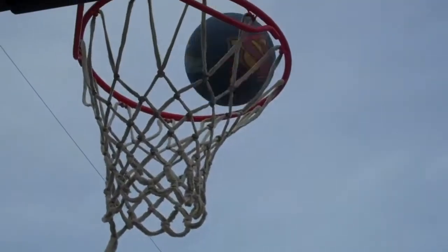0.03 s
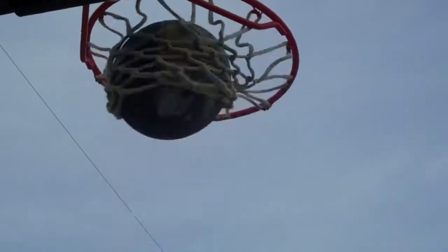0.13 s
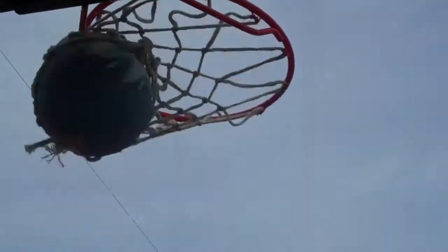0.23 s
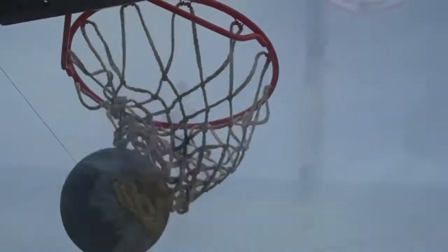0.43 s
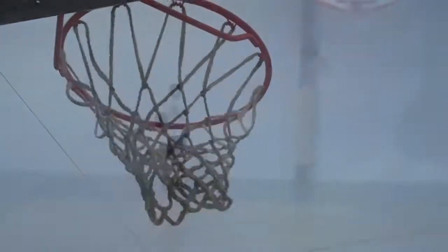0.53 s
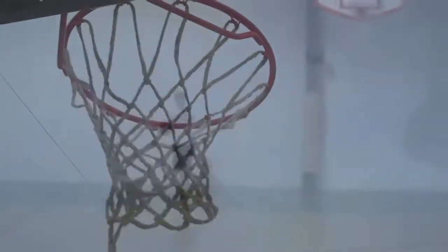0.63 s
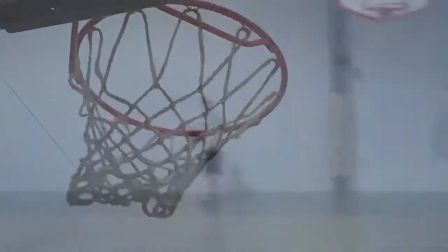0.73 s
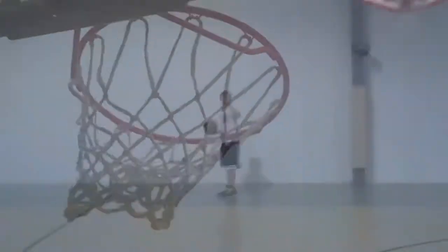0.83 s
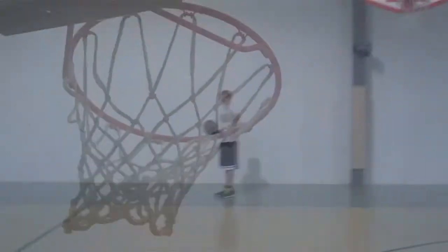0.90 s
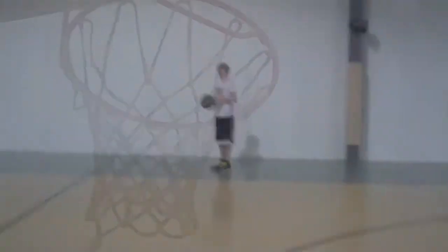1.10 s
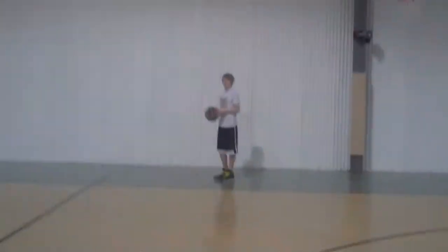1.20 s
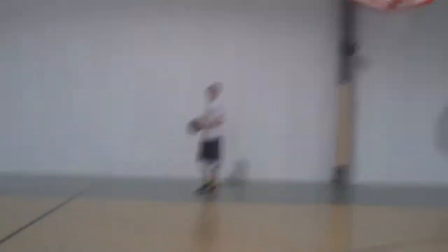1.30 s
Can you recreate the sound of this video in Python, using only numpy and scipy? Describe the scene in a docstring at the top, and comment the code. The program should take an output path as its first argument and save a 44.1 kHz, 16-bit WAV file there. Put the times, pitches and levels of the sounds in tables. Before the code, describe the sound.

Close up, a basketball hits the net with a quick snap and slides through in a rustling swish. The swinging cords settle as quiet outdoor air fades into faint gym hiss, and one dry knock comes last.

```python
"""Basketball through the net

Outdoors, close to the microphone, a ball slaps the cords in a quick volley, snaps the net taut and
slides out; the net whips back, rustles and flicks to rest. Soft bumps and a bird's chirp come first.
The outdoor air fades into the hiss of a gym, and a dry knock comes last."""
import sys
import numpy as np
from scipy import signal
from scipy.io import wavfile
from scipy.ndimage import map_coordinates

SR = 44100
rng = np.random.default_rng(int(sys.argv[2]) if len(sys.argv) > 2 else 0)


def wrap_up_sound(samples):
    """Save the sound to the file named by the first command line argument, as 16-bit audio."""
    columns = np.atleast_2d(samples).T
    # keep every value between -1 and 1, then stretch to whole-number steps
    tamed = np.clip(columns, -1, 1)
    steps = np.round(tamed * 32767).astype(np.int16)
    wavfile.write(sys.argv[1], SR, steps)


N = 59535
T = np.arange(N) / SR


def amp(db):
    """Decibels to gain."""
    return 10 ** (np.asarray(db) / 20)


def unit_rms(x):
    """Scales to unit rms."""
    return x / np.sqrt(np.mean(x ** 2) + 1e-20)


def add(mix, start_s, sound):
    """Mixes a sound in at its start time."""
    part = mix[max(round(start_s * SR), 0):][:len(sound)]
    part += sound[:len(part)]


def colour(x, spectrum, tilt_db=0, size=4096):
    """Causal filter of unit energy with the given spectrum, tilted per octave around 2 kHz."""
    octave = np.log2(abs(np.fft.fftfreq(size, 1 / SR)) + 1)
    hz, db = np.transpose(spectrum)
    tilt = tilt_db * np.clip(octave - np.log2(2000), -2, 2)
    log_gain = np.log(amp(np.interp(octave, np.log2(hz), db) + tilt))
    minimum_phase = np.exp(np.conj(signal.hilbert(log_gain)))
    taps = np.fft.ifft(minimum_phase).real[:size // 2]
    return signal.fftconvolve(x, taps / np.linalg.norm(taps))[:len(x)]


def resonate(x, hz, width_hz):
    """One resonance, at unit rms."""
    pole = np.exp((2j * np.pi * hz - np.pi * width_hz) / SR)
    return unit_rms(signal.lfilter([1], [1, -pole], x).real)


def waver(depth, width_hz):
    """A factor that wanders randomly around one."""
    return 1 + depth * resonate(rng.standard_normal(N), 0, width_hz)


def slips(per_s=7000, spread_db=3):
    """Dense tiny stick-slip clicks of uneven size."""
    size = amp(spread_db * np.minimum(rng.exponential(1, N), 4))
    return unit_rms(size * rng.choice([-1, 1], N) * (rng.random(N) < per_s / SR))


def snap(spectrum, db, decay_s, tilt_db, click=0.32):
    """A sharp contact and a quickly dying scuff."""
    fade = np.exp(-T[:SR // 8] / decay_s)
    scuff = unit_rms(rng.standard_normal(len(fade)) * fade)
    scuff[0] -= click * np.sqrt(len(fade))
    contact = unit_rms(scuff) * np.sqrt(np.mean(fade ** 2))
    return amp(db) * colour(contact, spectrum, tilt_db)


def ring(modes):
    """Dying sines of a struck body."""
    t = T[:SR * 3 // 4]
    return sum(amp(db - 60 * t / t60) * np.sin(2 * np.pi * hz * t) for hz, db, t60 in modes)


# The open air and the gym's room tone. Each row: frequency in Hz, relative density in dB.
OUTDOOR_SPECTRUM = [(20, 2.5), (60, -2.5), (150, 3.5), (400, -4.5), (1000, -2.5), (2000, -16.5),
                    (4000, -23), (8000, -32.5), (14000, -39.5)]
GYM_SPECTRUM = [(20, 12.5), (80, -7), (170, -0.5), (300, -3.5), (420, -14), (680, -0.5), (1600, -1),
                (2600, -14), (5500, -27), (10000, -20), (14000, -34)]

def background(air_db=-54, hiss_db=-59.5, whine_db=-71, fade_from_s=0.38, fade_to_s=1.25):
    """Low outdoor air gives way to a thinner indoor hiss with a faint whine."""
    indoors = np.clip((T - fade_from_s) / (fade_to_s - fade_from_s), 0, 1)
    air, hiss, whine = rng.standard_normal((3, N))
    for _ in range(2):
        whine = resonate(whine, hz=5330, width_hz=610)
    outside = amp(air_db) * colour(air, OUTDOOR_SPECTRUM)
    gym = amp(hiss_db) * colour(hiss, GYM_SPECTRUM) + amp(whine_db) * whine
    return (1 - indoors) * outside + indoors * gym


def echo(x, dull_hz=4000, delay_s=0.0091, t60_s=0.16):
    """Dull scatter from the surroundings reaches the microphone just after the direct sound."""
    tail = rng.standard_normal(N) * (T > delay_s) * np.exp(-np.log(1000) * T / t60_s)
    tail = signal.lfilter([1], [1, -np.exp(-2 * np.pi * dull_hz / SR)], tail)
    return signal.fftconvolve(x, tail / np.linalg.norm(tail))[:N]


# A faint chirp outdoors and its higher lead-in. Each row: time in seconds, pitch in Hz, level in dB.
CHIRP_GLIDE = [(.07, 2400, -87), (.094, 3000, -61.5), (.105, 3650, -58), (.117, 3880, -52.5),
               (.132, 3900, -63), (.139, 3210, -51), (.15, 3220, -49), (.158, 3100, -65), (.178, 2600, -54)]
LEAD_IN_GLIDE = [(.05, 3710, -78), (.07, 4350, -67), (.085, 4860, -63.5), (.102, 5860, -76)]

def bird_note(glide, edge_s=0.0056):
    """One gliding, fluttering note of a small bird."""
    times, hz, db = np.transpose(glide)
    pitch = np.interp(T, times, hz) * waver(depth=0.032, width_hz=250)
    flutter = unit_rms(waver(depth=0.25, width_hz=120))
    gate = np.clip(np.minimum(T - times[0], times[-1] - T) / edge_s, 0, 1)
    return gate * flutter * amp(np.interp(T, times, db)) * np.sin(2 * np.pi * np.cumsum(pitch) / SR)


# Soft bumps. Each row: centre in seconds, level in dB, pitch in Hz, half length in seconds.
SOFT_BUMPS = [(.0155, -42.5, 215, 0.0082), (0.0224, -24, 387, 0.002), (0.036, -39, 417, 0.0034),
              (0.0523, -29, 167, 0.003), (.219, -32, 110, 0.0028), (.808, -42.5, 860, 0.0033),
              (0.813, -47, 290, 0.013), (.818, -44.5, 158, 0.012), (1.201, -48.5, 490, 0.0023)]

def bumps():
    """Dull thuds, a few cycles long at most."""
    out = np.zeros(N)
    for centre_s, db, hz, half_s in SOFT_BUMPS:
        t = T - centre_s
        swell = 1 / np.cosh(np.clip(2.7 * t / half_s, -30, 30))
        out += amp(db) * swell * np.sin(2 * np.pi * hz * t)
    return out


# A dry knock in the gym and its after-taps. Each row: start in seconds, snap level in dB,
# decay in seconds, tilt in dB per octave, treble limit in Hz, ring gain in dB.
KNOCK_TAPS = [(1.1913, -26, 0.0024, 3.5, 12300, -43), (1.1944, -30.5, 0.0017, 1, 6100, -31),
              (1.1968, -42, .001, 7, 11100, -50.5), (1.2056, -27, 0.00083, -4, 4200, -40.5),
              (1.2345, -47, 0.0073, 2, 12000, -63)]
# The contact's colour. Each row: frequency in Hz, relative density in dB.
KNOCK_SPECTRUM = [(25, -18), (120, -21), (400, 1.5), (1500, -1.5), (2800, 3.5), (3600, -1), (4600, -2),
                  (6000, -10.5), (7300, -9.5), (9700, -25), (12000, -21.5), (14000, -47)]
# The knocked body. Each row: frequency in Hz, relative level in dB, T60 in seconds.
KNOCK_MODES = [(111, -14, 0.028), (235, -9, 0.05), (447, -16, 0.012), (758, -3.5, 0.041), (1189, -2, 0.03),
               (2240, -10, 0.025), (2890, -11, 0.012), (4630, -16, 0.01), (7000, -5, 0.0094)]

def knocks():
    """A hard, bright click, then a few quick after-taps, some dull, some faint and bright."""
    out, body = np.zeros(N), ring(KNOCK_MODES)
    for start_s, db, decay_s, tilt_db, top_hz, ring_db in KNOCK_TAPS:
        tap = snap(KNOCK_SPECTRUM, db, decay_s, tilt_db)
        low_pass = signal.butter(4, top_hz, fs=SR, output="sos")
        add(out, start_s, signal.sosfilt(low_pass, tap + amp(ring_db) * body[:len(tap)]))
    return out


# The swinging net's resonances. Each row: frequency in Hz, width per pass in Hz, relative level in dB.
THRUM_BANDS = [(118, 100, -6), (200, 68, -8.5), (573, 40, -0.5), (814, 19, -5.5), (916, 31, -6.5),
               (1288, 53, -8)]

def thrum(level_db=-47, start_s=0.508, rise_s=0.03, t60_s=0.9):
    """The net whips back and its cords thrum faintly as the swing dies."""
    age = np.maximum(T - start_s, 0)
    swing = np.minimum(age / rise_s, 1) * np.exp(-np.log(1000) * age / t60_s)
    cords = sum(amp(db) * resonate(resonate(slips(), hz, width), hz, width)
                for hz, width, db in THRUM_BANDS)
    return amp(level_db) * swing * cords


# Loose cords flicking, close by. Each row: start in seconds, relative level in dB,
# decay in seconds, tilt in dB per octave.
CORD_FLICKS = [(0.4215, -33, 0.0041, 7), (0.4696, -37, 0.0031, -0.5), (0.4964, -31, 0.004, -6),
               (0.5112, -42.5, .003, -5), (.5240, -39, 0.0062, 26), (.542, -43, 0.004, 10),
               (0.573, -37, 0.0052, -9), (0.5957, -44, 0.018, -3.5), (0.6215, -38, 0.0086, 2.5),
               (.642, -49, 0.0059, 12), (0.6672, -37.5, 0.0047, -2), (0.673, -37, 0.0053, -3.5),
               (0.7086, -40.5, 0.0079, 3), (0.724, -48, 0.0063, 21), (0.735, -40, 0.0033, 9.5),
               (0.756, -46, 0.0044, 17), (.763, -46, 0.012, -8.5), (.777, -48, 0.0036, 27),
               (0.792, -43, 0.0044, 10), (0.822, -53.5, 0.0046, 24), (0.8521, -48.5, 0.032, -12.5),
               (0.92, -48.5, 0.0063, 0.5)]
# The colour of cord on cord. Each row: frequency in Hz, relative density in dB.
FLICK_SPECTRUM = [(50, -28), (150, -23), (600, -23), (2200, 7.5), (3000, 2), (4500, -0.5), (7000, -8.5),
                  (10500, -16.5), (14000, -34)]

def flicks(rise_s=0.00054):
    """The empty net swings and its cords brush together."""
    out = np.zeros(N)
    for start_s, db, decay_s, tilt_db in CORD_FLICKS:
        brush = snap(FLICK_SPECTRUM, db, decay_s, tilt_db, click=0)
        add(out, start_s, brush * np.minimum(T[:len(brush)] / rise_s, 1))
    return out


# Sliding cords. Each row: centre in seconds, half length in seconds, pitch in Hz, level in dB.
CORD_SQUEAKS = [(0.33, 0.0064, 9000, -55), (.385, 0.013, 305, -41), (.386, 0.0077, 5140, -31.5),
                (0.391, 0.0067, 1651, -61), (0.391, 0.015, 1495, -37), (0.4, 0.014, 2094, -37),
                (0.405, 0.0062, 1335, -54), (0.464, 0.02, 528.5, -45.5), (0.528, 0.005, 4750, -47),
                (0.555, 0.006, 4340, -45), (0.558, 0.0061, 7200, -46), (0.572, 0.0059, 2726, -42.5),
                (0.677, 0.013, 2140, -49), (0.71, 0.0023, 5200, -44), (0.773, 0.012, 4750, -55)]

def squeaks():
    """Where the slips fall into step, a cord gives a short, unsteady tone."""
    out = np.zeros(N)
    for centre_s, half_s, hz, db in CORD_SQUEAKS:
        pitch = hz * waver(depth=0.0218, width_hz=250)
        swell = np.exp(-((T - centre_s) / half_s) ** 2 / 2)
        out += amp(db) * swell * np.sin(2 * np.pi * np.cumsum(pitch) / SR)
    return out


def shimmer(x, depth_db, patch_hz=168.5, patch_s=0.028, size=1024):
    """Cord lengths and tensions keep changing, so narrow resonances come and go."""
    frames = dict(fs=SR, nperseg=size, noverlap=size * 3 // 4)
    hz, t, spectra = signal.stft(x, **frames)
    field = rng.standard_normal((size, size))
    grid = np.meshgrid(hz / patch_hz, t / patch_s, indexing="ij")
    patches = unit_rms(map_coordinates(field, grid, order=1, mode="wrap"))
    _, shimmering = signal.istft(spectra * amp(depth_db * np.clip(patches, -2, 2)), **frames)
    return unit_rms(shimmering[:N])


# Cords rubbing near the microphone. Each row: time in seconds, then mid, treble and bass levels in dB.
RUB_LEVELS = [(0.218, -28, -46, -64), (.25, -40, -34.5, -55), (0.278, -34, -46, -28.5),
              (0.301, -44, -57, -36), (0.323, -37.5, -35.5, -40.5), (0.35, -42, -45.5, -41.5),
              (0.388, -35.5, -50, -44), (0.423, -39.5, -42.5, -46), (0.442, -47, -56.5, -51),
              (0.475, -42.5, -46.5, -46), (0.489, -52, -58, -57), (.515, -56.5, -63, -49),
              (0.556, -42, -51.5, -49.5), (.595, -56, -69, -46.5), (.655, -57, -86, -52.5),
              (.74, -53.5, -66, -52), (.86, -56, -67.5, -56.5), (.96, -58, -78, -58.5),
              (1.15, -62, -96, -64.5)]
# The colours of those three bands. Each row: frequency in Hz, relative density in dB.
MID_SPECTRUM = [(400, -31), (1000, -7.5), (1550, 5), (2100, -1.5), (2500, -1.5), (4500, -4), (6500, -10),
                (9000, -17.5), (14000, -74)]
TREBLE_SPECTRUM = [(2000, -59), (5000, 5), (7000, -4), (10000, 1), (12000, -9.5), (14000, -7.5)]
BASS_SPECTRUM = [(30, -9), (100, -28), (180, -4), (310, -3), (420, -2), (530, 2), (660, -2.5), (850, -4),
                 (1300, -8.5), (3000, -33.5)]

def rustle(rise_s=0.0028):
    """Cords stick and slip over the ball and then over each other."""
    times, mid_db, treble_db, bass_db = np.transpose(RUB_LEVELS)
    bands = [(mid_db, MID_SPECTRUM, 3.2), (treble_db, TREBLE_SPECTRUM, 4), (bass_db, BASS_SPECTRUM, 2)]
    rub = np.zeros(N)
    for db, spectrum, shimmer_db in bands:
        friction = colour(shimmer(slips(), shimmer_db), spectrum)
        rub += amp(np.interp(T, times, db)) * friction
    return np.clip((T - times[0]) / rise_s, 0, 1) * rub


# Ball against cords, close to the microphone. Each row: start in seconds, relative snap level in dB,
# decay in seconds, tilt in dB per octave, ring gain in dB.
BALL_SLAPS = [(.2172, -17.5, 0.0028, 1.5, -35), (.2195, -19.5, 0.0017, 1, -56),
              (.2222, -20, 0.0022, 3.5, -49), (.2255, -20, 0.0019, -5.5, -44.5),
              (.2368, -20, 0.00083, 4, -21), (.2385, -25, 0.0027, 7, -22), (.2428, -16, 0.0042, 2, -26),
              (.2468, -18.5, 0.003, -0.5, -37), (.2498, -12.5, 0.0011, -4.5, -36),
              (.2560, -40, 0.0049, 9, -27.5), (.2595, -14, 0.0012, 0.5, -18.5),
              (.2622, -24.5, 0.0033, 6, -25.5), (.2655, -6, 0.00067, -6, -32.5),
              (.2668, -13.5, 0.00085, 4, -44)]
# The colour of a slap. Each row: frequency in Hz, relative density in dB.
SLAP_SPECTRUM = [(30, -26), (110, -25), (250, -13), (600, -3), (1100, -3.5), (2000, 3.5), (3200, -3),
                 (6000, -11), (11000, -18.5), (14000, -28)]
# The ring of the slapped cords, and of ball and hoop as the net jerks taut.
# Each row: frequency in Hz, relative level in dB, T60 in seconds.
CORD_MODES = [(259, -5.5, 0.049), (651, -2, 0.026), (894, -2, 0.033), (1190, -24, 0.068), (1422, -7, 0.094),
              (1637, -7, 0.059), (1817, -12, 0.071), (2024, -6, 0.05), (2057, -1, 0.055), (2180, -9, 0.064),
              (2480, -12, 0.039), (2600, -14.5, 0.065), (3894, -4.5, 0.1), (4710, -14, 0.074),
              (5480, -11, 0.03), (6110, -4.5, 0.043)]
BALL_AND_HOOP_MODES = [(302, -37, 0.49), (495, -43, 0.14), (740, -25.5, 0.093), (811.4, -35, 0.31),
                       (911, -14, 0.043), (1226, -28, 0.086), (1335, -32, 0.1), (2126, -38, 0.58)]

def ball_in_net(taut_s=0.2655, low_cut_hz=320):
    """The ball slaps through the cords and pulls the net taut with a hollow thock."""
    out, cords = np.zeros(N), ring(CORD_MODES)
    for start_s, db, decay_s, tilt_db, ring_db in BALL_SLAPS:
        add(out, start_s, snap(SLAP_SPECTRUM, db, decay_s, tilt_db))
        add(out, start_s, amp(ring_db) * cords)
    add(out, taut_s, ring(BALL_AND_HOOP_MODES))
    low_cut = signal.butter(2, low_cut_hz, "high", fs=SR, output="sos")  # thin cords radiate little bass
    return signal.sosfilt(low_cut, out)


def scene(net_echo_db=-18, bird_echo_db=-14, knock_echo_db=-22):
    """One microphone close to the net, with bumps, bird, knock and air around it."""
    foreground = ball_in_net() + rustle() + flicks() + thrum() + squeaks() + bumps()
    knock = knocks()
    bird = bird_note(CHIRP_GLIDE) + bird_note(LEAD_IN_GLIDE)
    scatter = echo(amp(net_echo_db) * foreground + amp(bird_echo_db) * bird + amp(knock_echo_db) * knock)
    return (foreground + knock + bird + scatter + background())[None]


def record(dry, top_hz=14050):
    """The recorder's band limit."""
    low_pass = signal.firwin(511, top_hz, window=("kaiser", 9), fs=SR)
    return signal.oaconvolve(dry, low_pass[None], "same")


dry = scene()
out = record(dry)
wrap_up_sound(out)
```